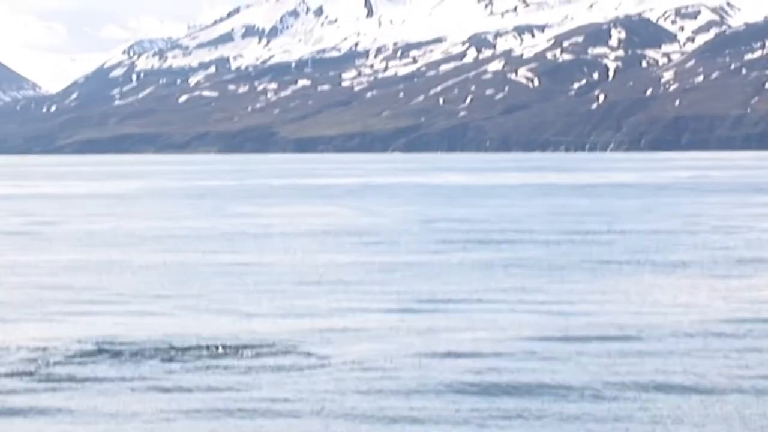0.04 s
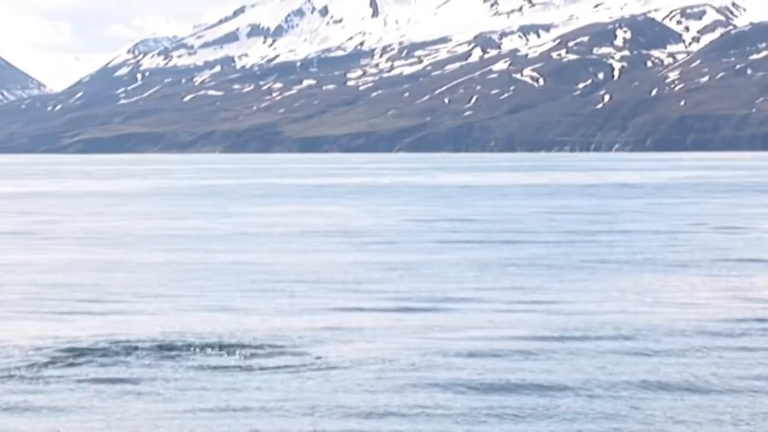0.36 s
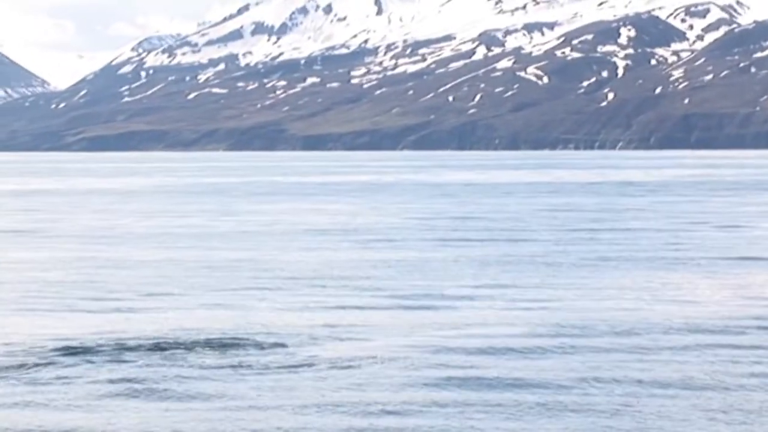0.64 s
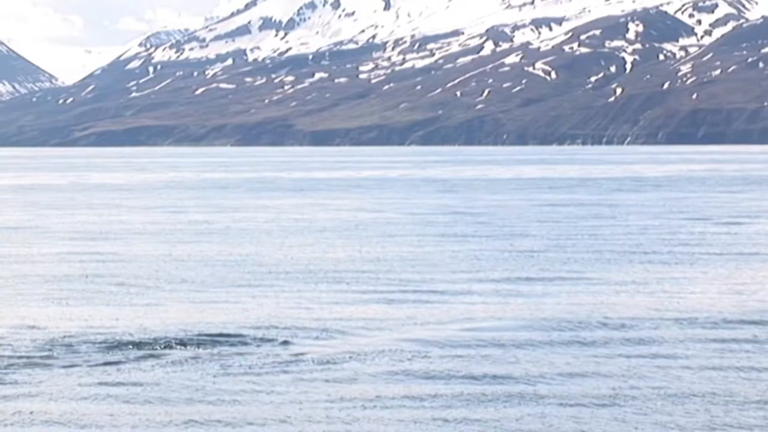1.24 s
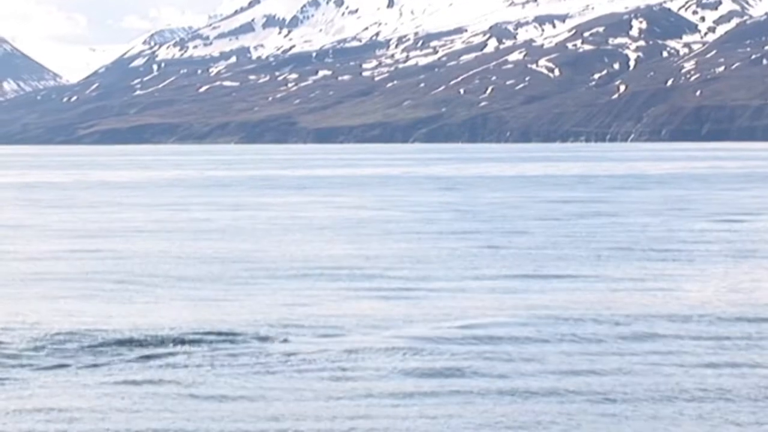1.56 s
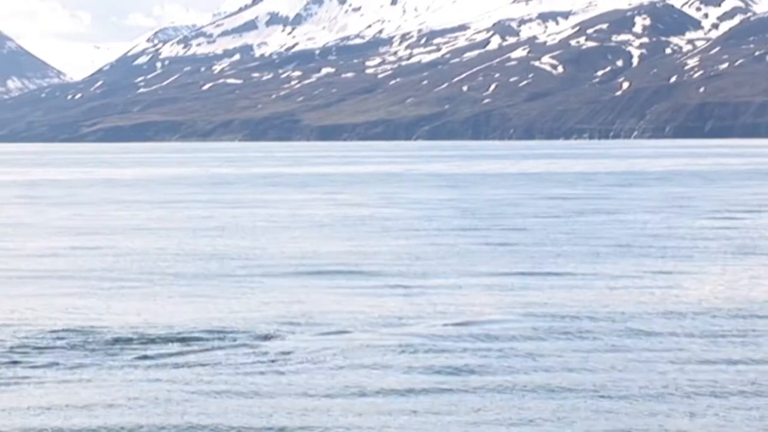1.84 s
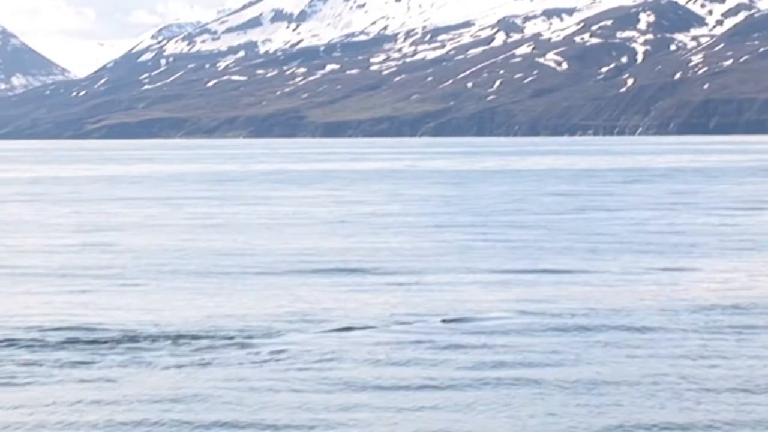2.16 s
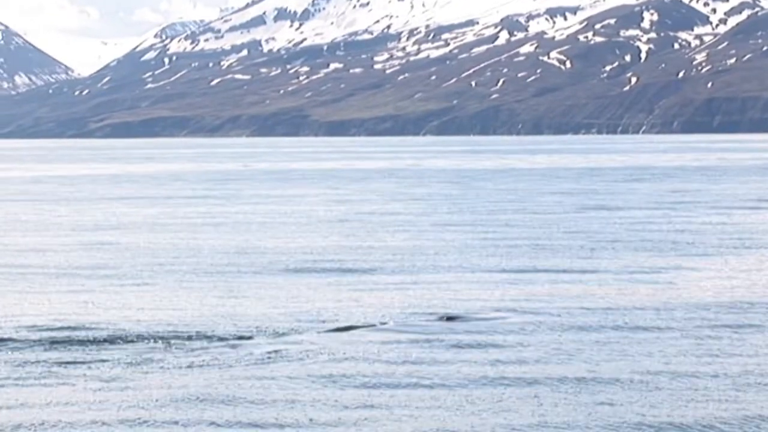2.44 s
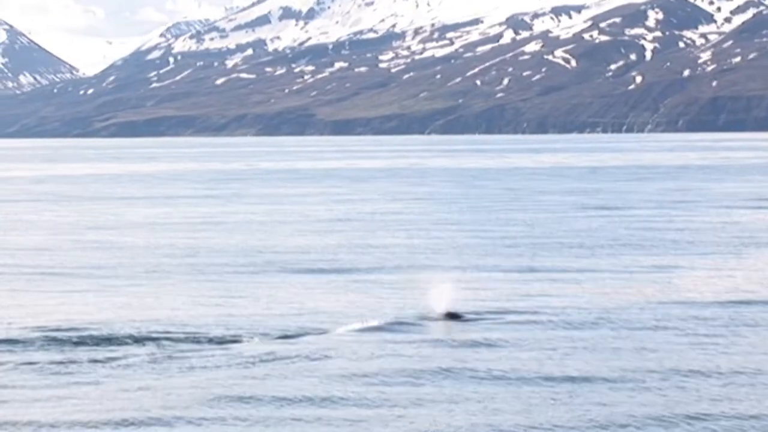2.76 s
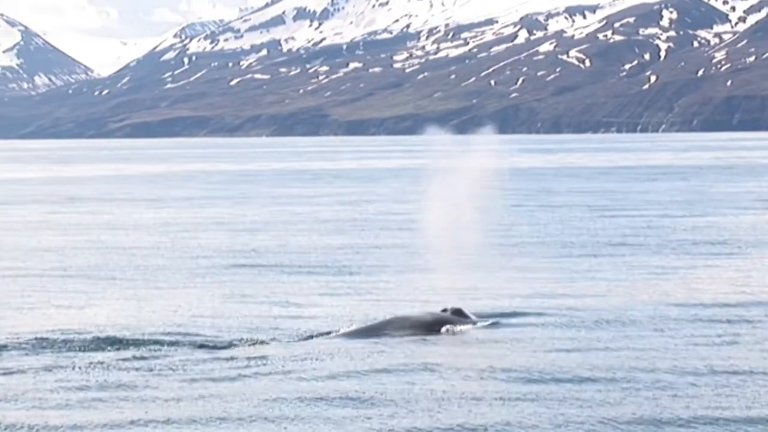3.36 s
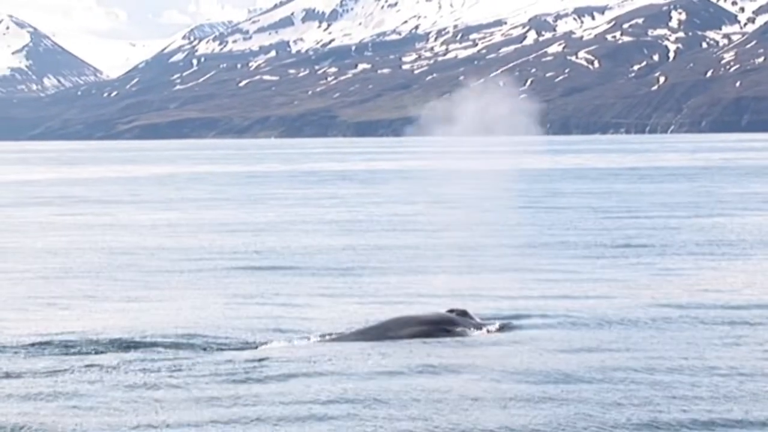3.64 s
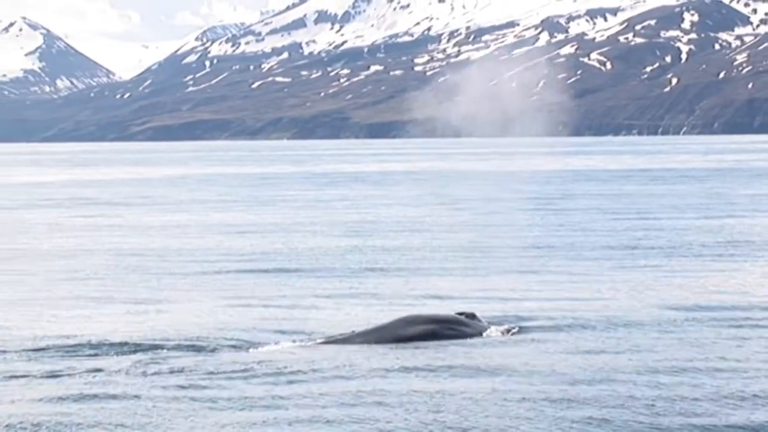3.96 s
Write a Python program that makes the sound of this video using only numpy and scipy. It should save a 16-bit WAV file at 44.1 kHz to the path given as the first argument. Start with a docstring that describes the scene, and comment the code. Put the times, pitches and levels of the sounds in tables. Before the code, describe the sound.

One hissing whale breath, with a diesel boat throbbing and small waves lapping.

```python
"""Whale blow beside an idling boat

A whale surfaces on a calm bay and blows once, heard from the deck. The blow opens as a sharp hiss,
gains a hollow roar and darkens as the pressure runs out; the water mirrors it.
A six-cylinder diesel throbs through the hull, and small waves wash, fizz and splash alongside."""
import sys
import numpy as np
from scipy import signal
from scipy.fft import rfft, irfft
from scipy.io import wavfile
from scipy.ndimage import uniform_filter1d

SR = 44100
rng = np.random.default_rng(int(sys.argv[2]) if len(sys.argv) > 2 else 0)


def generate_wav(signal):
    """Clip the signal to [-1, 1] and save it as 16-bit WAV at the path in sys.argv[1]."""
    frames = np.transpose(np.atleast_2d(signal))
    scaled = np.clip(frames, -1, 1) * 32767
    pcm = np.round(scaled).astype(np.int16)
    wavfile.write(sys.argv[1], SR, pcm)


N = 176400


def undb(db):
    """Decibels to gain."""
    return 10 ** (np.asarray(db) / 20)


def unit(x):
    """Scale to rms 1."""
    return x / np.sqrt(np.mean(x ** 2))


def colour(x, curve):
    """EQ by a curve of (frequency [Hz], level [dB]), rolled off past its ends, to rms 1."""
    hz, db = np.array(curve, float).T
    f = np.maximum(np.fft.rfftfreq(N, 1 / SR), 1)
    rolloff = np.minimum(f / hz[0], 1) ** 2 * np.minimum(hz[-1] / f, 1) ** 2
    return unit(irfft(rfft(x) * rolloff * undb(np.interp(np.log(f), np.log(hz), db)), N))


def noise(curve, channels=1):
    """Coloured noise, unrelated between channels."""
    return colour(rng.standard_normal((channels, N)), curve)


def ring(x, hz, width_hz):
    """One resonance, gain 1 at its centre."""
    return signal.lfilter(*signal.iirpeak(hz, hz / width_hz, SR), x)


def resonate(x, modes):
    """Add a body's ringing modes to the dry sound."""
    return x + sum(undb(db) * ring(x, hz, width) for hz, width, db in modes)


def drift(rate_hz):
    """Smooth random modulation, rms 1."""
    knots = np.clip(rng.standard_normal(4096), -2, 2)
    step = max(int(SR / rate_hz), 1)
    ramps = np.interp(np.arange(N) / step, np.arange(len(knots)), knots)
    return unit(uniform_filter1d(ramps, step // 2 + 1))


# envelope of the blow (time [s], hiss level [dB], roar level [dB])
BLOW_ENVELOPE = [(2.99, -36, -45), (3.07, -37.5, -46.5), (3.125, -34, -41), (3.22, -36, -41),
                 (3.33, -34.5, -40.5), (3.5, -37.5, -38.5), (3.6, -41, -42), (3.74, -43.5, -45.5),
                 (3.9, -51, -53)]
# bright jet at the blowhole, hollow airway behind it (frequency [Hz], level [dB])
HISS_EQ = [(700, -29), (1200, -17.5), (1700, 6.5), (2300, -3.5), (3000, -3.5), (3600, -7.5), (4200, -7.5),
           (5000, -10.5), (5800, -32.5), (7000, -36.5), (10000, -41), (15000, -53.5)]
ROAR_EQ = [(250, -22), (480, -5), (700, -6), (1000, -1.5), (1400, 2.5), (1900, 0.5), (2800, -38),
           (6000, -49)]
# airway resonances (frequency [Hz], width [Hz], gain [dB])
AIRWAY_MODES = [(1390, 230, 4), (1730, 220, -12), (2320, 160, 1.5), (2875, 130, -2.5), (4850, 300, -4),
                (5830, 150, -3)]
# early reflections off water and boat (delay [ms], gain [dB])
REFLECTIONS = [(.3225, -1.3), (1.7, -16), (2.22, -22), (2.92, -21), (3.55, -23)]


def whale_blow(t, start_s=2.958, attack_s=.031, end_s=3.84, release_s=.15, treble_db_per_s=-3.5):
    """Air tears through the blowhole, rings the airway and arrives with its reflections."""
    f = np.fft.rfftfreq(N, 1 / SR)
    echoes = [undb(db) * np.exp(-2j * np.pi * f * ms / 1000) for ms, db in REFLECTIONS]
    comb = np.prod(1 + np.array(echoes), axis=0)
    voice = lambda eq: unit(irfft(comb * rfft(resonate(noise(eq), AIRWAY_MODES)), N))
    hiss, roar = voice(HISS_EQ), voice(ROAR_EQ)
    age = np.maximum(t - start_s, 0)
    body = signal.sosfiltfilt(signal.butter(2, 2710, fs=SR, output="sos"), hiss)
    hiss = body + (hiss - body) * undb(treble_db_per_s * age)  # the treble fades first
    times, hiss_db, roar_db = np.array(BLOW_ENVELOPE).T
    air = hiss * undb(np.interp(t, times, hiss_db)) + roar * undb(np.interp(t, times, roar_db))
    attack = np.minimum(age / attack_s, 1)
    release = np.exp(-(np.maximum(t - end_s, 0) / release_s) ** 2)
    turbulence = undb(.5 * drift(25.7) + .85 * drift(300))  # slow flutter, fast sputter
    return air * attack * release * turbulence


# exhaust drone (harmonic [x firing rate], level [dB])
EXHAUST_HARMONICS = [(1, -36), (2, -36.5), (3, -47.5), (4, -30.5), (5, -40), (7, -45.5), (9, -48)]
# accent of each cylinder in turn (gain [dB])
CYLINDER_ACCENTS = [-1, -4, -0.5, 1.5, -5.5, 0.5]
# dark tone of the hull (frequency [Hz], level [dB])
HULL_EQ = [(20, -14), (40, -4.5), (56, 3), (110, -0.5), (140, -1), (170, 0.5), (193, -6.5), (222, -0.5),
           (290, -6), (335, -4.5), (365, -8), (410, -10.5), (445, -16.5), (530, -19.5), (620, -35),
           (1200, -49.5)]
# hull resonances (frequency [Hz], width [Hz], gain [dB])
HULL_RESONANCES = [(175.7, 9.7, 5), (209.6, 9.7, -5), (245.8, 9, -7), (322.2, 12, -2), (391.1, 12, -1.5),
                   (419, 10, 1), (528.5, 17, -5.5)]
# a rattle, then two faint high whines of the camera case (frequency [Hz], width [Hz], level [dB])
RATTLE_AND_WHINES = [(1660, 110, -62), (4860, 270, -80.5), (5715, 260, -83)]


def diesel(firing_hz=31.05, waver_db=1.82, scatter_db=1.5, throb=.3, rumble_db=-31.5, knock_db=-39):
    """Each firing feeds the exhaust drone, shakes the hull and pulses a rattle and two faint whines."""
    cycles = np.cumsum(firing_hz * (1 + .002 * drift(3))) / SR
    firing, phase = cycles.astype(int), cycles % 1
    drone = 0
    for harmonic, db in EXHAUST_HARMONICS:
        peak = np.sqrt(2) * undb(db + waver_db * drift(13))
        drone += peak * np.sin(2 * np.pi * (harmonic * cycles + rng.random()))
    accent_db = np.array(CYLINDER_ACCENTS)[firing % len(CYLINDER_ACCENTS)]
    force = undb(accent_db + scatter_db * rng.standard_normal(256)[firing])
    pulse = unit(force * np.exp(-phase / .46))
    hull = lambda x: colour(resonate(x, HULL_RESONANCES), HULL_EQ)
    polarity = np.sign(rng.standard_normal(256))[firing]
    knocks = hull(force * np.diff(firing, prepend=0) * polarity)
    rumble = hull(rng.standard_normal(N) * (1 - throb + throb * pulse))
    ringing = 0
    for hz, width, db in RATTLE_AND_WHINES:
        shake = pulse * rng.standard_normal(N)
        ringing += undb(db) * unit(ring(ring(shake, hz, width), hz, width))
    pan = undb([[-.12], [.12]])  # a hair to the right
    return pan * (drone + undb(rumble_db) * rumble + undb(knock_db) * knocks + ringing)


# dull bumps (centre time [s], half-width [s], pitch [Hz], level [dB])
HULL_BUMPS = [(.04, 0.029, 175, -35), (.135, 0.025, 175, -32.5), (0.612, 0.028, 160, -26),
              (.795, 0.026, 180, -31), (1.254, 0.013, 140, -23), (2.598, 0.028, 150, -29),
              (3.547, 0.041, 230, -33.5)]


def hull_bumps(t, wander=.25):
    """The hull booms softly, as from a passing wave, a few uneven cycles each time."""
    boom = lambda hz: unit(np.sin(2 * np.pi * np.cumsum(hz * (1 + wander * drift(200))) / SR))
    return sum(undb(db) * np.exp(-((t - at) / span) ** 2) * boom(hz) for at, span, hz, db in HULL_BUMPS)


# wash of water and breeze, centre and sides (frequency [Hz], level [dB])
WASH_MID_EQ = [(300, -2), (650, -2.5), (950, 0.5), (1300, -1.5), (1900, -9), (2400, -8.5), (2900, -8),
               (3700, -15), (5000, -23), (5800, -29), (6800, -40.5), (9000, -37), (15000, -33.5)]
WASH_SIDE_EQ = [(28, 6.5), (130, 12.5), (200, 3.5), (320, 4.5), (500, -1), (750, -9), (1300, -13),
                (2000, -18), (3100, -30), (4200, -20), (5800, -28), (7000, -36.5), (10000, -43),
                (15000, -43.5)]
# soft wind on the left (frequency [Hz], level [dB])
WIND_EQ = [(450, -9), (580, 2), (800, -1.5), (1020, -13.5), (1400, -8), (1900, -7.5), (2500, -23.5)]
# airy top of foam and spray (frequency [Hz], level [dB])
FIZZ_EQ = [(6000, -24.5), (9000, -3.5), (12000, .5), (13700, 3), (15500, -6)]


def water_and_wind(mid_db=-51.5, side_db=-42.5, wind_db=-53, foam_db=-77.5):
    """An even wash flickers with the ripples, with soft, steady wind on the left and foam on top."""
    flicker = lambda: undb(.4 * drift(20))
    side = undb(side_db) * noise(WASH_SIDE_EQ) * [[undb(.5)], [-1]]  # opposite polarity for width
    foam = noise(FIZZ_EQ, channels=2)
    crackle = unit(undb(.5 * drift(7) + 1.5 * drift(600)))
    wind = undb(wind_db) * noise(WIND_EQ) * flicker() * [[1], [0]]
    mid = undb(mid_db) * noise(WASH_MID_EQ)
    return wind + mid * flicker() + side * flicker() + undb(foam_db) * foam * crackle


# splash hits, then short scratchy ticks near the close (time [s], decay [s], slap level [dB], spray level [dB])
SPLASHES_AND_TICKS = [(.815, .012, -60, -78), (.87, .06, -77, -69), (2.515, .03, -77, -71),
                      (2.575, .09, -79.5, -73), (3.365, 0.014, -65, -64), (3.718, .012, -69, -64),
                      (3.732, .016, -58, -63), (3.857, 0.01, -71, -65), (3.927, 0.011, -52, -70),
                      (3.95, 0.0062, -43.5, -54.5), (3.99, 0.0081, -38.5, -49)]
# wet slap (frequency [Hz], level [dB])
SLAP_EQ = [(400, -10), (1000, -6), (2800, 4), (4400, -3), (5000, 3), (5400, -2), (5900, -4.5),
           (7000, -16.5), (12000, -26.5)]


def splashes_and_ticks(t, rise_s=.0018, grain_db=3):
    """Small waves slap and throw a short patter of spray; near the end come a few short scratchy ticks."""
    slap, spray = noise(SLAP_EQ, channels=2), noise(FIZZ_EQ, channels=2)
    out = 0
    for start, decay, slap_db, spray_db in SPLASHES_AND_TICKS:
        age = np.maximum(t - start, 0)
        envelope = np.minimum(age / rise_s, 1) * np.exp(-np.maximum(age - rise_s, 0) / decay)
        out += envelope * (undb(slap_db) * slap + undb(spray_db) * spray)
    return out * undb(grain_db * drift(700))


def bubbles(per_s=22, low_hz=900, high_hz=4200, base_db=-61.5, decay_cycles=10, glide=.016):
    """Bubbles ring briefly and rise in pitch where ripples meet the hull."""
    age = np.arange(4096) / SR
    out = np.zeros((2, N + len(age)))
    for when, pitch, strength, side in rng.random((int(per_s * N / SR), 4)):
        hz = low_hz * (high_hz / low_hz) ** pitch
        life = age * hz / decay_cycles
        envelope = np.exp(-life) * (1 - np.exp(-10 * life))
        ping = envelope * np.sin(2 * np.pi * hz * age * (1 + glide * life / 2))
        accent_db = 4 * min(-np.log(1 - strength), 3)  # a few pop out
        gain = undb(base_db + accent_db) * np.sqrt(low_hz / hz)
        pan = 1 + (2 * side - 1) * np.array([[.3], [-.3]])
        start = int(when * N)
        out[:, start:start + len(age)] += gain * ping * pan
    return out[:, :N]


# far-off peeps (centre time [s], length [s], pitch [Hz], glide [octaves], level [dB])
PEEP_NOTES = [(.707, .06, 3050, -.03, -55.5), (.968, .1, 2050, -1.8, -55.5), (1.314, .035, 2640, 0, -55),
              (1.384, .035, 2640, 0, -52.5)]


def peeps(t, quaver=.052):
    """Short hoarse whistles, perhaps seabirds, barely rise above the wash."""
    out = 0
    for centre, length, hz, glide, db in PEEP_NOTES:
        along = np.clip((t - centre) / length, -.5, .5)
        pitch = hz * 2 ** (glide * along) * (1 + quaver * drift(800))
        out += undb(db) * np.cos(np.pi * along) * np.sin(2 * np.pi * np.cumsum(pitch) / SR)
    return out


def tick(at_s=2.4917, impulse_db=-36, low_cut_hz=3500):
    """One faint, dry tick with no ring."""
    impulse = undb(impulse_db) * signal.unit_impulse(N, int(at_s * SR))
    return signal.sosfilt(signal.butter(2, low_cut_hz, "high", fs=SR, output="sos"), impulse)


def scene():
    """The whale ahead, the boat underfoot, water all round."""
    t = np.arange(N) / SR
    return (whale_blow(t) + diesel() + hull_bumps(t)
            + water_and_wind() + bubbles() + splashes_and_ticks(t) + peeps(t) + tick())


def record(dry):
    """Tiny fades at both ends and a steep high cut at 15.3 kHz."""
    faded = dry * signal.windows.tukey(N, .001)
    return signal.sosfiltfilt(signal.ellip(8, .1, 50, 15300, fs=SR, output="sos"), faded)


dry = scene()
out = record(dry)
generate_wav(out)
```